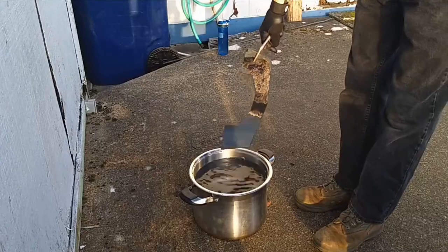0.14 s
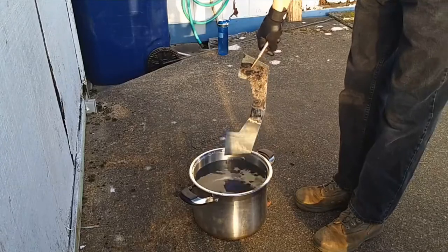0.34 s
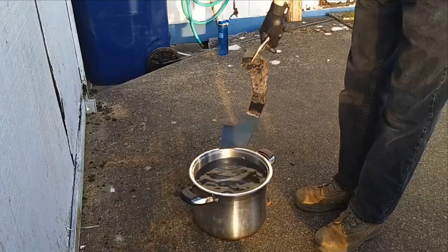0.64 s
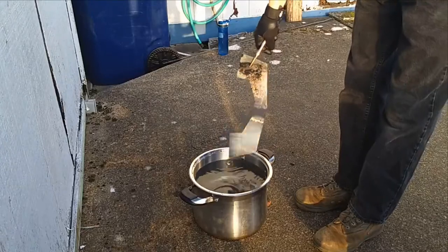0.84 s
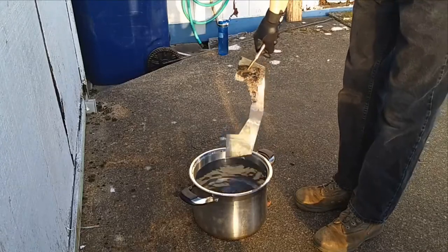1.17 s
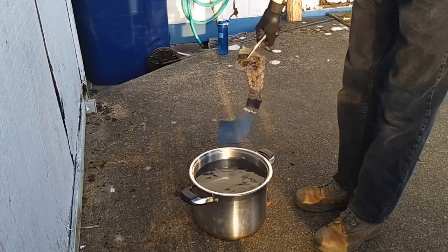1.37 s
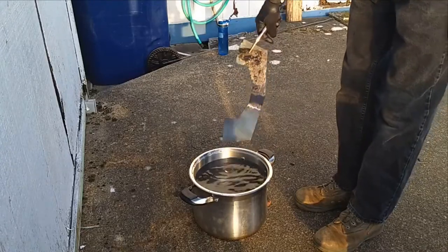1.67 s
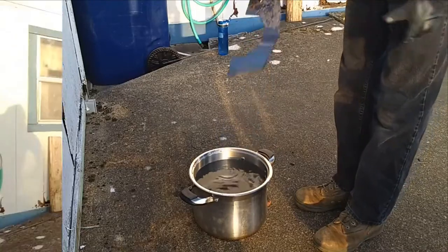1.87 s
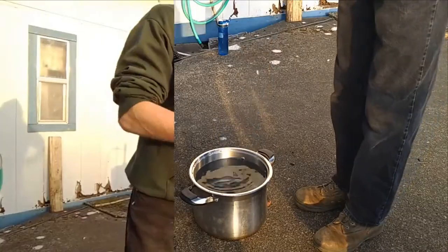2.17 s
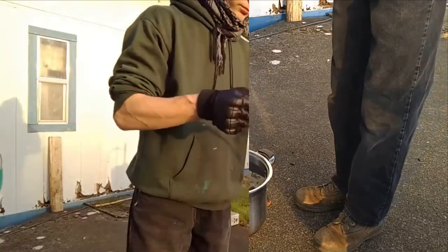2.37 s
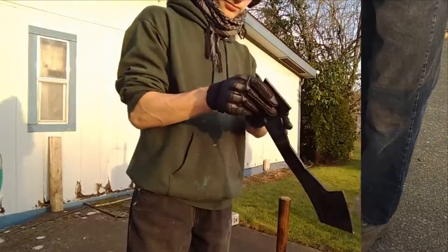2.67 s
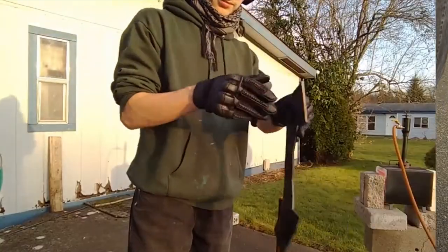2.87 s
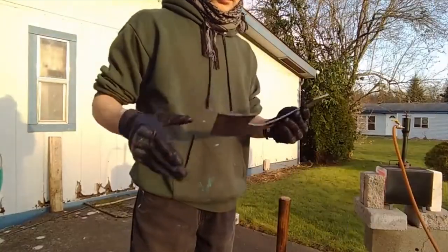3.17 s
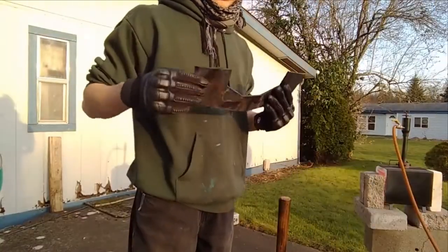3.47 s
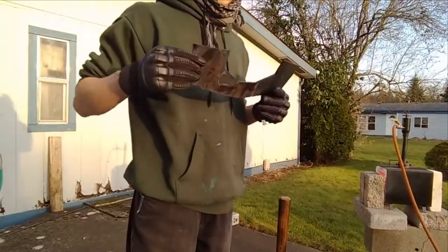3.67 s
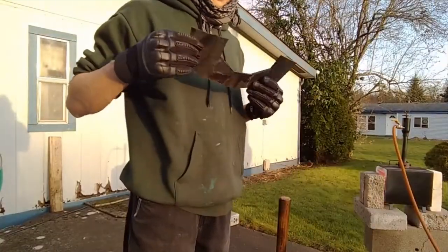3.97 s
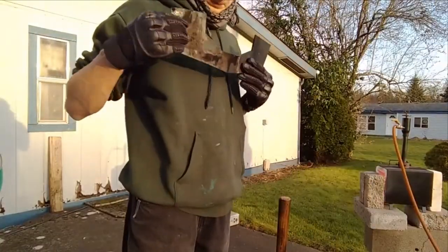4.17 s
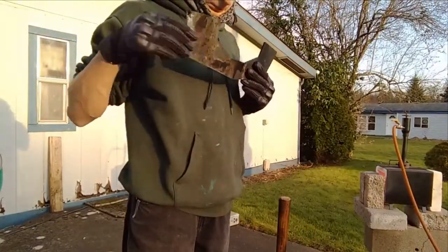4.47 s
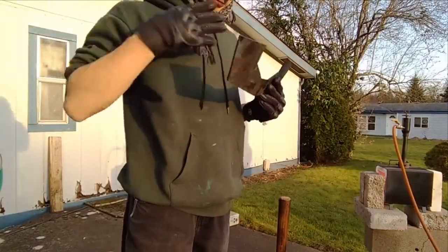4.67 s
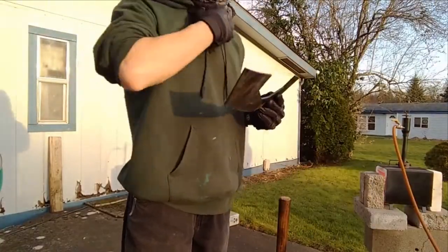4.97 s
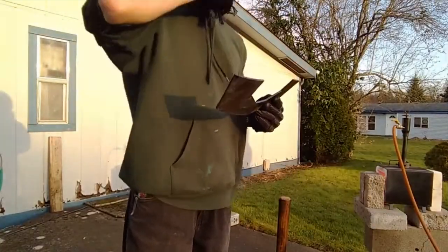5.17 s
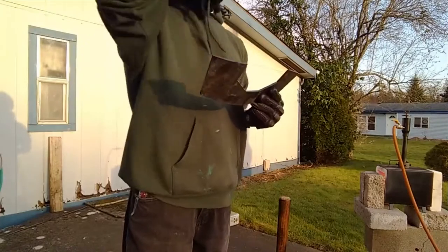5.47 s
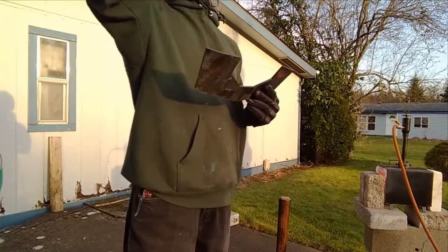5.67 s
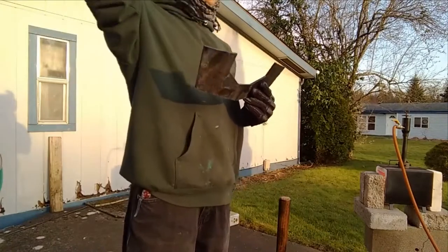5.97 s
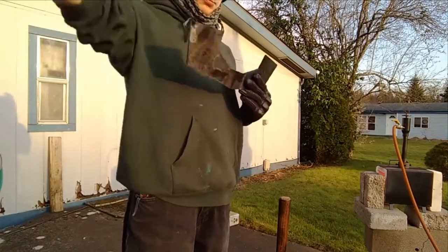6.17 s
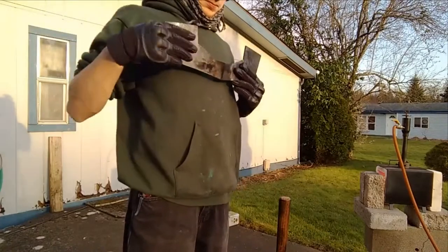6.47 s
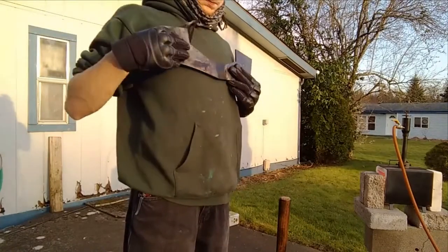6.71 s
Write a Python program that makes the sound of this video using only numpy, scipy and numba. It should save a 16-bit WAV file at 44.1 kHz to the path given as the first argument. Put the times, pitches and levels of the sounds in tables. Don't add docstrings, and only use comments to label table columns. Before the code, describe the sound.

A gas burner roars steadily outdoors with a fluttering low rumble and thin hiss, a bright steel knock at the start and a dull tap late.

```python
import sys
import numpy as np
from scipy import signal
from scipy.fft import rfft, irfft
from scipy.io import wavfile
from scipy.ndimage import uniform_filter1d, map_coordinates
from numba import njit

SR = 44100
rng = np.random.default_rng(int(sys.argv[2]) if len(sys.argv) > 2 else 0)


def attenuation_scalar(level_db):
    decades = np.asarray(level_db, float) / 20
    return 10 ** decades


def dump_mix(stems):
    frames = np.atleast_2d(stems).T
    limited = np.clip(frames, -1, 1)
    pcm = np.round(limited * 32767).astype(np.int16)
    wavfile.write(sys.argv[1], SR, pcm)


N = 301644
T = np.arange(N) / SR
SWITCH_S, FADE_FROM_S, FADE_S = 2.9563, 1.716, 0.47

# (peak time [s], rise [dB], length [s])
FLARES = [
    [(.03, -2.5, 0.057), (.08, 5, 0.11), (.27, 6, .2), (.52, 2.5, 0.084), (.72, 4, 0.14), (.9, 2.5, 0.13), (1., 1, .1), (1.25, 1.5, 0.17), (1.55, 6.5, 0.038), (1.61, -5, 0.12), (1.69, 3.5, 0.051), (1.9, 2, 0.21), (2.87, 3.5, 0.26)],
    [(2.05, 12.5, 0.26), (2.3, 5.5, 0.38), (2.62, 7, 0.54), (2.88, 10, 0.32), (3.17, 8, 0.23), (3.37, 4, 0.039), (3.53, 7, 0.13), (3.82, 8.5, 0.61), (4.12, 6, 0.22), (4.35, 6.5, 0.26), (4.55, 6, 0.32), (4.7, 6, 0.13), (4.88, 3.5, 0.12), (5.05, 5.5, 0.26), (5.2, 3, 0.14), (5.44, 5, 0.065), (5.8, 8, 0.19), (6.01, 1, 0.24), (6.29, 8.5, 0.41), (6.58, 5, 0.082)],
]


def level(x, db):
    return x * attenuation_scalar(db) / np.sqrt(np.mean(x ** 2))


@njit
def svf(x, hz, width):
    y, b, l = np.empty(len(x)), 0., 0.
    for i in range(len(x)):
        g, k = np.tan(np.pi * hz[i] / SR), width / hz[i]
        v = (b + g * (x[i] - l)) / (1 + g * (g + k))
        b, l, y[i] = 2 * v - b, l + 2 * g * v, k * v
    return y


def walk(rate_hz):
    hold = int(SR / rate_hz)
    steps = np.repeat(rng.standard_normal(N // hold + 1), hold)
    w = uniform_filter1d(uniform_filter1d(steps, hold), hold)[:N]
    return w / w.std()


def swells(events, column=1):
    return sum(e[column] * np.cos(np.pi * np.clip((T - e[0]) / e[-1], -.5, .5)) ** 2 for e in events)


def steadied(x, span_s, grip):
    power = uniform_filter1d(x ** 2, int(span_s * SR)) + 1e-12
    return level(x / power ** (np.clip(grip, 0, 1) / 2), 0)


def ring(hz, width_hz, db, flicker_db, rate_hz, push=None):
    hz = hz + np.zeros(N)
    if push is None:
        push = rng.standard_normal(N)
    band = svf(svf(push, hz, 1.11 * width_hz), hz, 1.11 * width_hz)
    return band * attenuation_scalar(db + flicker_db * walk(rate_hz))


def coloured(spectrum, flicker_db, rate_hz, patch_hz):
    f = np.maximum(np.fft.rfftfreq(N, 1 / SR), 1)
    hz, db = np.transpose(spectrum)
    gain_db = np.interp(np.log(f), np.log(hz), db, -80, db[-1])
    noise = irfft(rfft(rng.standard_normal(N)) * attenuation_scalar(gain_db), N)
    cells = signal.stft(noise, nperseg=512)[2]
    row = np.arange(cells.shape[0]) * SR / 512 / patch_hz
    frame = np.arange(cells.shape[1]) * 256 / SR * rate_hz
    rows, frames = np.meshgrid(row, frame, indexing="ij")
    field = map_coordinates(rng.standard_normal((300, 300)), [rows, frames], order=1)
    return signal.istft(cells * attenuation_scalar(flicker_db * field / field.std()), nperseg=512)[1][:N]


def whistles():
    # (frequency [Hz], width [Hz], level [dB])
    hardware_modes = [
        (767, 40, -52),
        (1486, 40, -58),
    ]
    valve_hz = 3342 + 4 * walk(6)
    valve = steadied(ring(valve_hz, 14.5, 0, flicker_db=-0.5, rate_hz=9.7), span_s=0.24, grip=1.0)
    valve = valve * attenuation_scalar(np.where(T < SWITCH_S, -60, -63.5) + 1.5 * walk(7))
    hardware = sum(level(ring(hz, w, 0, flicker_db=2.2, rate_hz=8.3), db) for hz, w, db in hardware_modes)
    hidden_db = -1.5 * (T < FADE_FROM_S + FADE_S)
    return valve + attenuation_scalar(hidden_db + 0.58 * swells(FLARES[1])) * hardware


def strike(modes, hits, crack_db):
    out = np.zeros(N)
    t = np.arange(SR // 5) / SR
    crack_band = signal.butter(2, [1500, 6500], "band", fs=SR, output="sos")
    for s, db in hits:
        ringing = np.zeros(len(t))
        for hz, mode_db, t60_s in modes:
            envelope = (1 - np.exp(-t / 0.001)) * 1000. ** (-t / t60_s)
            ringing += attenuation_scalar(mode_db + 4.8 * rng.standard_normal()) * np.sin(2 * np.pi * hz * t) * envelope
        crack = attenuation_scalar(crack_db) * rng.standard_normal(len(t)) * np.exp(-t / 0.0015)
        i = int(s * SR)
        out[i:i + len(t)] += attenuation_scalar(db) * (ringing + signal.sosfilt(crack_band, crack))
    return out


def steel_knocks():
    # (frequency [Hz], level [dB], t60 [s])
    knock_modes = [(1595, -0.5, 0.14), (2060, -6, 0.039), (2820, -6, 0.081), (3240, 1.5, 0.04),
                   (3800, -3, 0.025), (5580, -3, 0.051), (6300, -8, 0.044), (6550, -15, .04),
                   (7360, -11, 0.052)]
    tap_modes = [(1320, -10, .03), (1550, -3, 0.026), (1620, -6, 0.04)]
    # (time [s], level [dB])
    knock_hits = [
        (0.0307, -33.5),
        (0.037, -41),
        (0.05, -43),
    ]
    tap_hits = [
        (5.8545, -31),
    ]
    return strike(knock_modes, knock_hits, crack_db=3) + strike(tap_modes, tap_hits, crack_db=-26)


def jet(place, tube_hz, ring_db):
    # (multiple of tube pitch [1], width [Hz], level [dB])
    tube_modes = [
        [(1., 96, 8), (1.21, 139, -0.5), (1.8, 250, -17), (2., 350, -2), (2.12, 150, -6), (2.6, 503, -11), (3.42, 400, -14)],
        [(1., 87, 3), (1.22, 156, -5), (1.42, 90, -11), (1.67, 138, -18), (1.83, 180, -18), (2.03, 306, -6.5), (2.47, 250, -11.5), (3.25, 296, -19), (4.1, 350, -33)],
    ]
    # (frequency [Hz], level [dB per Hz])
    hiss_spectrum = [
        [(2400, -8.5), (3500, -8.5), (4400, -8.5), (4700, -45), (5000, -9), (6000, -7.5), (6800, -10.5), (8000, -9), (9400, -17.5), (10300, -11), (11900, -14.5), (13000, -13), (14500, -17), (15600, -14)],
        [(2400, -23.5), (2800, -13.5), (3500, -14), (4750, -22), (5200, -14), (6000, -12), (6900, -16), (8000, -18.5), (9250, -20), (10300, -20.5), (11800, -25.5), (13000, -20), (14400, -27.5), (15600, -25.5)],
    ]
    # (first gap [Hz], strength [0-1])
    echo_paths = [
        (2294, 0.6),
        (2350, 0.33),
    ]
    # (frequency [Hz], width [Hz], depth [0-1])
    edge_gaps = [
        [(3470, 130, .6), (6700, 220, .55), (9500, 400, .6), (11950, 350, .55), (14200, 300, .4), (14700, 350, .55)],
        [(4250, 130, .45), (4650, 120, .5), (4900, 150, .6), (5450, 150, .35), (6950, 280, .7), (8550, 200, .3), (9200, 300, .6), (11400, 350, .35), (11950, 250, .55), (13850, 300, .5), (14500, 250, .3)],
    ]
    tube_hz = tube_hz * (1 + 0.0049 * walk(25))
    modes = sum(ring(k * tube_hz, w, db + ring_db / k ** 3.2, flicker_db=2.2, rate_hz=16)
                for k, w, db in tube_modes[place])
    gas = modes + coloured(hiss_spectrum[place], flicker_db=2.1, rate_hz=24, patch_hz=220)
    gas = gas * attenuation_scalar(0.36 * walk(24.32))
    gap_hz, strength = echo_paths[place]
    lag = SR / (gap_hz * (tube_hz / tube_hz.mean()) ** 0.17)
    echo = map_coordinates(gas, [np.arange(N) - lag], order=3)
    spec_hz = np.fft.rfftfreq(N, 1 / SR)
    echo = irfft(rfft(echo) / (1 + (spec_hz / 8000) ** 4), N)
    gas = gas - np.clip(strength, 0, 1) * echo
    for hz, w, depth in edge_gaps[place]:
        gas = gas - np.clip(depth, 0, 1) * svf(gas, hz + np.zeros(N), 1. * w)
    return level(gas, 0)


def burner(place):
    # (frequency [Hz], width [Hz], level [dB])
    boom_modes = [(74.2, 32.3, 0), (123.3, 33, 3), (154, 31, -1.5), (188.3, 13.4, -11.5)]
    flame_modes = [
        [(241.7, 40, -2.5), (312.5, 56, -4.5), (374, 77, -10), (473, 131, -1), (576.3, 41.6, -1.5), (615, 21.5, -3)],
        [(240.8, 50.4, -4), (315.3, 41.7, -2.5), (368.8, 7, -2.5), (488.7, 113, -2.5), (584, 43, -4), (620.3, 46, -5)],
    ]
    # (frequency [Hz], level [dB per Hz])
    edge_spectrum = [
        [(400, -24), (680, -3), (758, -1), (1040, -4), (1240, -10.5), (1530, -12), (1850, -23), (2500, -27.5), (3250, -17), (5500, -120)],
        [(400, 0), (680, -2.5), (913, 2), (1080, -7), (1490, -12), (2050, -26.5), (2350, -56), (2500, -47.5), (3250, -58), (5500, -120)],
    ]
    # (flame [dB], chamber boom [dB], flame edge [dB], jet hiss [dB])
    resting_db = [
        (-29.5, -32, -47.5, -49),
        (-34, -32.5, -40.5, -50.5),
    ]
    # (time [s], level [dB])
    build_up = [
        (0., 1.3),
        (.6, -1),
        (1.3, 2),
        (1.9, 4.5),
        (2.5, 2.2),
        (2.95, 2.5),
    ]
    build_shares = (0.2, 0.17, 0.34)
    flare_shares = [
        (.2, 0.396, -0.047),
        (.3, 0.32, -0.033),
    ]
    # (peak time [s], rise [dB], length [s])
    throbs = [(.92, 3, .12), (1.3, 2.5, 0.35), (1.5, -3.5, 0.31), (1.66, 3.5, .1), (1.9, -6, 0.16),
              (2.07, -0.5, .15), (2.69, 3, 0.14), (3.95, 4, .2), (4.35, -6, 0.13), (4.47, 3, 0.19),
              (4.81, 6, 0.14), (5.59, -9, 0.11), (6.72, -6, 0.087), (6.83, 5, 0.18)]
    # (peak time [s], hiss rise [dB], tube ring rise [dB], length [s])
    spurts = [
        [(.16, .3, -1, 0.13), (.46, 2, -2.5, 0.31), (.66, -1, -4, 0.14), (.8, 1.5, -4, .2), (.96, -3, 5.5, .15), (1.1, -2, -6, 0.11), (1.3, -0.7, 4.5, 0.17), (1.46, 1, 2, .15), (1.97, 1.4, 1, 0.26)],
        [(2.14, 5.5, -0.5, .2), (2.36, 2.5, 3.5, 0.27), (2.74, 2.2, -2, 0.11), (3.07, -0.5, 0.7, .12), (3.31, 2, 2.5, 0.43), (3.59, 2, 0.7, 0.23), (3.9, 0.5, 1.5, 0.16), (4.19, -1, 2.5, 0.15), (4.37, 2.5, -3, .17), (4.76, 2.5, -0.2, 0.55), (4.9, -2, 2.5, 0.12), (5.17, 3.5, 3, 0.12), (5.3, 0.5, 3, 0.17), (5.47, 3.5, 3.5, .15), (5.58, 5, 1.2, .15), (5.85, 2, -0.5, 0.37), (6., -2, -1.5, 0.3), (6.13, 1.5, 0, .15), (6.26, 2.5, -2.5, 0.25), (6.45, 2, 0, 0.37), (6.62, 0.5, 6, 0.22), (6.84, 2.2, -2, 0.14)],
    ]
    rest_hz, rest_ring_db = (3041, 3133)[place], (-3.5, -1)[place]
    sag_hz_per_db, lift_hz_per_db = (20, 10.5)[place], (8, 24.5)[place]
    damp_per_db = (-0.47, 0.8)[place]

    flare = swells(FLARES[place])
    build = np.interp(T, *np.transpose(build_up)) * (place == 0)
    effort = build + flare
    spurt_db, tube_rise_db = swells(spurts[place]), swells(spurts[place], column=2)
    boom_db, edge_db, jet_db = (rest + a * build + b * flare for rest, a, b in
                                zip(resting_db[place][1:], build_shares, flare_shares[place]))
    eddies = walk(45)
    gusts = rng.standard_normal(N) * attenuation_scalar(0.6 * walk(130) + 0.66 * eddies)
    flame = sum((-1) ** k * ring(*mode, flicker_db=1.27, rate_hz=14, push=gusts)
                for k, mode in enumerate(flame_modes[place]))
    boom = sum((-1) ** k * ring(*mode, flicker_db=0.5, rate_hz=16, push=gusts)
               for k, mode in enumerate(boom_modes))
    edge = coloured(edge_spectrum[place], flicker_db=0.83, rate_hz=12, patch_hz=200) * attenuation_scalar(0.11 * eddies)
    tube_hz = rest_hz - sag_hz_per_db * (flare if place else build) + lift_hz_per_db * tube_rise_db
    ring_db = rest_ring_db - damp_per_db * effort + tube_rise_db
    return (attenuation_scalar(resting_db[place][0] + effort) * steadied(flame, span_s=0.074, grip=0.75)
            + attenuation_scalar(boom_db + swells(throbs)) * steadied(boom, span_s=0.091, grip=0.7)
            + attenuation_scalar(edge_db) * level(edge, 0)
            + attenuation_scalar(jet_db + spurt_db) * jet(place, tube_hz, ring_db))


def scene():
    behind = uniform_filter1d(1. * (T < SWITCH_S), size=200)
    facing = np.clip((T - FADE_FROM_S) / FADE_S, 0, 1)
    fire = behind * burner(place=0) + facing * burner(place=1)
    tick = attenuation_scalar(-28) * np.exp(-np.maximum(T - SWITCH_S, 0) / .0001) * (T >= SWITCH_S)
    return (whistles() + steel_knocks() + fire + tick)[None]


def mute_weak(x, lead):
    # (frequency [Hz], level [dB])
    mute_floor = [(2000, -87), (4700, -90.5), (6900, -89), (9400, -93.5), (12000, -95.5), (15000, -98)]
    cells = signal.stft(np.r_[np.zeros(lead), x], window="cosine", nperseg=2048)[2]
    bands = cells[:1024].reshape(128, 8, -1)
    band_db = 10 * np.log10(2 * np.mean(bands.real ** 2, axis=1) + 1e-20)
    limit_db = np.interp((np.arange(128) + .5) * SR / 256, *np.transpose(mute_floor))
    kept = np.repeat(band_db > limit_db[:, None], 8, axis=0)
    kept = np.r_[kept, kept[:1]]
    return signal.istft(cells * kept, window="cosine", nperseg=2048)[1][lead:lead + N]


def low_pass(x):
    return signal.sosfilt(signal.butter(12, 16130, fs=SR, output="sos"), x)


def record(dry):
    x = signal.sosfilt(signal.butter(2, 45, "high", fs=SR, output="sos"), dry)
    x = signal.sosfilt(signal.ellip(14, .3, 80, 15720, fs=SR, output="sos"), x)
    x = mute_weak(x[0], lead=207)[None]
    return low_pass(x)


dry = scene()
out = record(dry)
dump_mix(out)
```